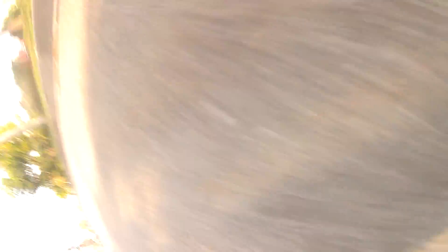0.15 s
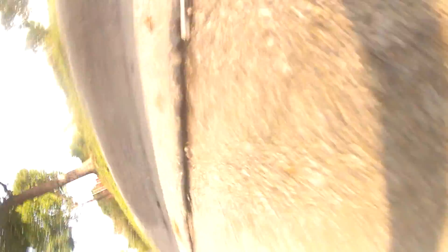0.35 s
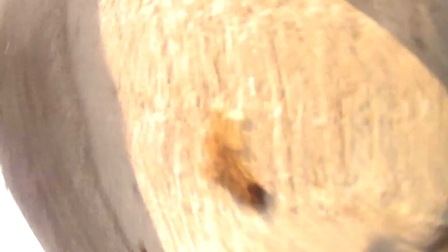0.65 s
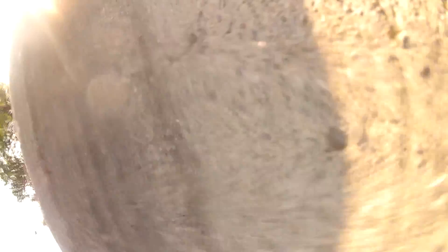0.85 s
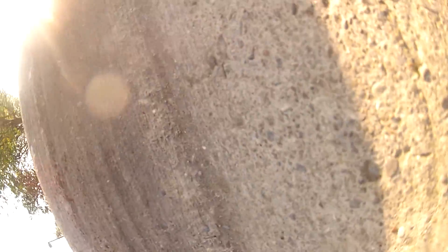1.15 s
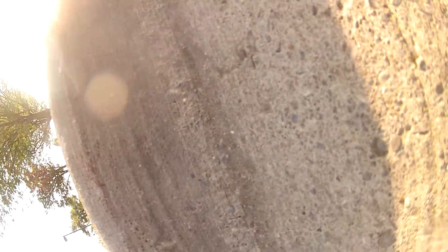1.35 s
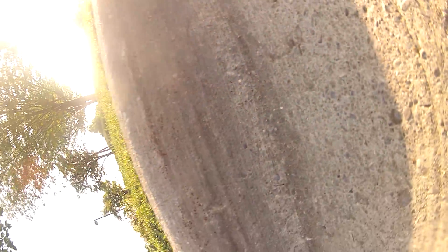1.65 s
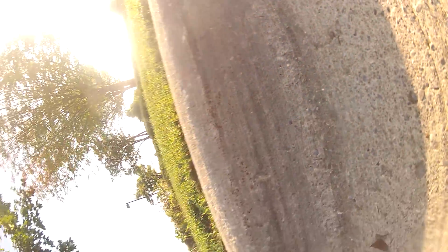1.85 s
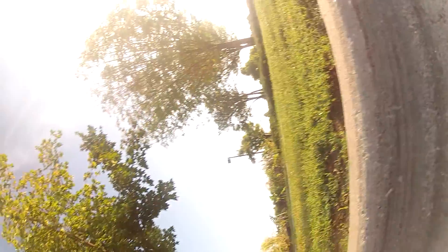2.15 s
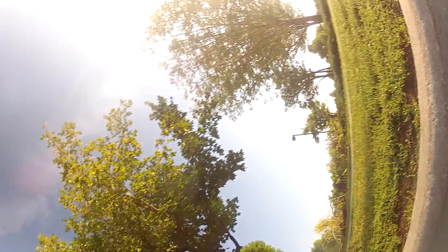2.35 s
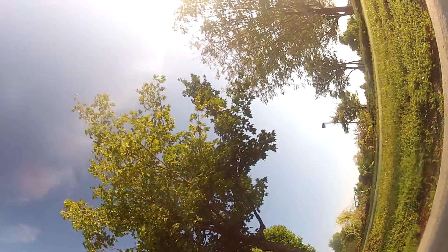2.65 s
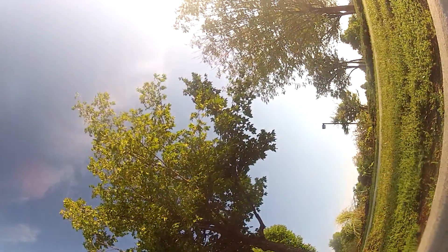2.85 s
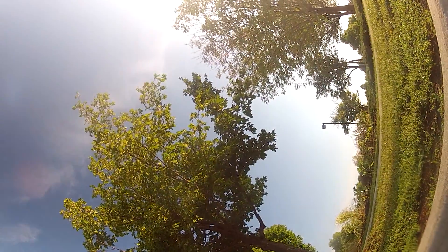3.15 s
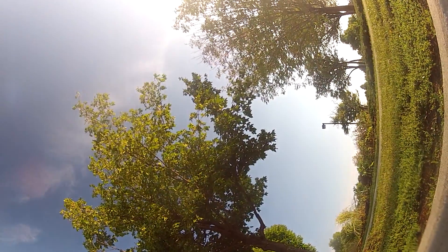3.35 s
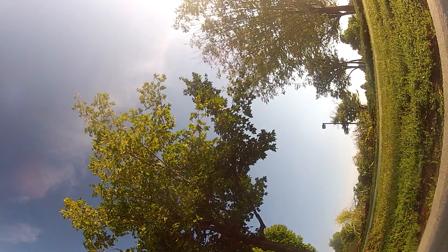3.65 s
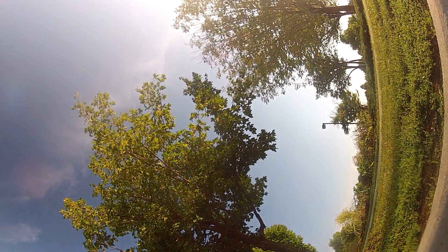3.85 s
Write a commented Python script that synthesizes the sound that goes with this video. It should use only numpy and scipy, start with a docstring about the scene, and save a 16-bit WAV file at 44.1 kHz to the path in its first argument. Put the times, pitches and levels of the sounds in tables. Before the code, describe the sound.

Bicycle tumbling on rough ground, sharp knocks, hollow thuds and gritty scrapes, heard from its frame

```python
"""On gravel and pavement, a bicycle falls, skids and tips to rest, heard by a camera fixed to it.
Noise bursts (blows) and random grains (slides, rubbing) drive filters for crack, housing ring and thud.
Blows and friction leave the frame ringing as thin tones; the mount shakes at one low wandering note.
Deep noise follows the thuds over faint air; a rubbing wheel hums now and then, ticking softly in the first.
Coarsely held samples add a thin mirrored fizz, and the recorder clips the loudest peaks."""
import sys
import numpy as np
from scipy import signal
from scipy.fft import rfft, irfft, next_fast_len
from scipy.io import wavfile
from scipy.ndimage import uniform_filter1d, map_coordinates

SR = 44100
rng = np.random.default_rng(int(sys.argv[2]) if len(sys.argv) > 2 else 0)


def transcribe(signal):
    """Save signal, clipped to [-1, 1], as a 16-bit WAV file at the path in sys.argv[1]."""
    frames = np.atleast_2d(signal).T
    limited = np.clip(frames, -1, 1)
    pcm = np.round(limited * 32767).astype(np.int16)
    wavfile.write(sys.argv[1], SR, pcm)


N = 176400
IR_LEN = 8192  # samples
MIC_CUTOFF_HZ = 3510  # low-pass of the housing

# hollow resonances of the bicycle on pavement: f/Hz, width/Hz, relative level/dB before tilt
TUBES = [(378, 35, 8), (474.7, 52, 3), (608, 22.5, 5.5), (763, 71, -2), (1020, 36, -5), (1376, 49, -16),
         (2057, 55, -21.5), (2634, 54, -40), (2887, 140, -32), (3436, 150, -39)]

# grit: stones, clumps of pressure, even friction re stones
GRAINS_PER_S, GRAIN_SPREAD_DB, SMOOTH_DB = 600, 5, -6.5
CLUMPS_PER_S, CLUMP_DB = 70, 2.5
# contacts
SCRAPE_EDGE_S = 0.0042  # rise and fall of a slide
KNOCK_REF_S = 0.003  # length that a blow's level refers to
FIRST_TOUCH = 2.9  # impulse against chatter of rms 1
CLEAR_FROM_S, CLEAR_TO_S = 1.3, 2.55  # camera clear of the ground; rubbing stays so to the end
BRIGHT_DB_PER_OCT, BRIGHT_DB = 8.5, -5  # tubes' upper modes re muffled crack while clear
DETUNE = 0.057  # std of log pitch shift per contact point
CRACK_DB = 6.5  # crack track in the mix
# frame
FRAME_DB, FRAME_DRIFT_RAD = -7, 0.97  # re housing; phase drift of each mode
# mount
SHAKE_HZ, SHAKE_REST_HZ, SHAKE_WANDER_HZ = 74.82, 70.6, 4.14  # swinging hard, at rest, unsteadiness
SHAKE_DB, SWING_MAX = 0.5, 0.85  # gain; end of travel in full scale
# rumble
LURCH_DB, LURCH_S = 2, 0.11  # re thuds; averaging window
AIR_DB = -45
# wheel
HUM_HZ, HUM_WANDER_HZ, HUM_ROUGH_DB = 382, 9, 3.5
HUM_RISE_S, HUM_FALL_S = 0.047, 0.078
TICK_FROM_S, TICK_TO_S, TICKS_PER_S, TICK_DB = 1.105, 1.27, 47, -11
# recorder
HOLD_HZ, TOP_HZ = 12000, 15600
FIZZ_DB, DRIVE_DB = 0.5, -0.5


def amp(db):
    """Decibels to gain."""
    return 10 ** (np.asarray(db) / 20)


def unit(x):
    """Scale to rms 1."""
    return x / np.sqrt(np.mean(x ** 2) + 1e-20)


def curves(rows):
    """Interpolate each column after the time to one value per sample."""
    s, *cols = np.transpose(rows)
    return [np.interp(np.arange(N) / SR, s, c) for c in cols]


def wobble(rate_hz):
    """Smooth random curve with rate_hz knots a second."""
    knots = rng.standard_normal(int(N * rate_hz / SR) + 4)
    return map_coordinates(knots, [np.arange(N) * rate_hz / SR])


def through(x, h):
    """Play x through an impulse response."""
    return signal.fftconvolve(x, h)[:N]


def add(track, s, x):
    """Mix x into the track from time s."""
    part = track[max(round(s * SR), 0):][:len(x)]
    part += x[:len(part)]


def colour(points):
    """Minimum-phase impulse response of energy 1 with this (f/Hz, level/dB) spectrum."""
    hz, db = np.transpose(points)
    f = np.fft.rfftfreq(IR_LEN, 1 / SR)
    gain = amp(np.interp(np.log(f + 1), np.log(hz), db))
    cep = irfft(np.log(gain))
    # folding the cepstrum makes the response causal
    cep[1:IR_LEN // 2] *= 2
    cep[IR_LEN // 2 + 1:] = 0
    h = irfft(np.exp(rfft(cep)))
    return h / np.linalg.norm(h)


def muffled(h):
    """Impulse response low-passed by the housing, scaled to energy 1."""
    sos = signal.butter(10, MIC_CUTOFF_HZ, fs=SR, output="sos")
    h = signal.sosfilt(sos, h)
    return h / np.linalg.norm(h)


def resonances(rows, tilt_db=0, shift=1):
    """Damped modes of alternating sign, tilted in dB per octave and shifted in pitch, then muffled."""
    f = np.fft.rfftfreq(IR_LEN, 1 / SR) / shift
    spectrum = 0
    for k, (hz, width, db) in enumerate(rows):
        gain = (-1) ** k * amp(db + tilt_db * np.log2(hz))
        bandpass = 1j * f * width / (hz * hz - f * f + 1j * f * width)
        spectrum = spectrum + gain * bandpass
    return muffled(irfft(spectrum))


def grit():
    """Contact force of sliding: stones of random size catch in clumps, over even friction."""
    caught = rng.random(N) < GRAINS_PER_S / SR
    size = amp(GRAIN_SPREAD_DB * np.clip(rng.standard_normal(N), -2, 2))
    stones = caught * rng.choice([-1, 1], N) * size
    pressure = amp(CLUMP_DB * np.clip(wobble(CLUMPS_PER_S), -1.5, 1.5))
    friction = amp(SMOOTH_DB) * rng.standard_normal(N)
    return unit(pressure * (unit(stones) + friction))


def rubbing(on_gravel, clear):
    """Light grit between blows, passed through the gravel filters and later the clear ones."""
    # t/s, crack/dB before CRACK_DB, housing/dB, thud/dB
    rub_levels = [(0, -27, -20, -11), (.11, -47.5, -36, -30.5), (.34, -36.5, -28, -35.5),
                  (.51, -42.5, -40.5, -22), (.67, -45, -34, -29.5), (.8, -41, -28.5, -21),
                  (.94, -45.5, -34, -22.5), (1.02, -50.5, -35.5, -25), (1.26, -52.5, -53, -22),
                  (1.459, -54, -55, -39.5), (1.63, -51, -41, -30), (1.75, -62.5, -49.5, -50.5),
                  (1.95, -53.5, -31.5, -23.5), (2.21, -44.5, -36, -26), (2.321, -51, -30, -39),
                  (2.601, -44, -30, -20), (2.82, -55.5, -39, -31.5), (2.97, -68.5, -43, -32),
                  (3.061, -76.5, -50.5, -55), (4, -103, -96, -82)]
    rub = grit()
    lifted = np.arange(N) / SR > CLEAR_FROM_S
    tracks = []
    for db, near, far in zip(curves(rub_levels), on_gravel, clear):
        force = rub * amp(db)
        far = far / np.linalg.norm(far)
        tracks.append(through(force * ~lifted, near) + through(force * lifted, far))
    return tracks


def slides():
    """Slides on the ground: grit pressed on and released with linear edges."""
    # t/s, length/s, crack/dB before CRACK_DB, housing/dB, thud/dB
    scrapes = [(0.13, 0.072, -30, -20, -12), (0.249, 0.025, -17, -14, -24), (0.275, 0.042, -26.5, -37, -21),
               (0.363, 0.063, -28, -30, -30), (0.429, 0.048, -38, -31, -20),
               (0.693, 0.083, -29.5, -20.5, -10.5), (0.876, 0.054, -31, -21.5, -28),
               (1.143, 0.099, -55.5, -37.5, -19.5), (1.772, 0.037, -59, -32.5, -25),
               (1.806, 0.023, -45, -25.5, -29), (1.904, 0.0352, -59, -13.5, -22),
               (1.946, 0.11, -43.5, -26, -32.5), (2.115, .034, -27, -17, -18.5),
               (2.351, 0.058, -69, -20.5, -26), (2.453, 0.13, -38, -26, -14),
               (2.657, 0.065, -42.5, -26, -22)]
    slide = grit()
    forces = []
    for s, length, *dbs in scrapes:
        t = np.arange(int((length + SCRAPE_EDGE_S) * SR)) / SR
        press = np.clip(np.minimum(t, t[-1] - t) / SCRAPE_EDGE_S, 0, 1)
        forces.append((s, length, press * slide[int(s * SR):][:len(t)], dbs))
    return forces


def blows():
    """Blows: an impulse at first touch, then chatter decaying over the contact time."""
    # t/s, contact decay/s, crack/dB before CRACK_DB, housing/dB, thud/dB
    knocks = [(.052, 0.0014, -33, -35.5, -35), (.078, 0.0016, -33.5, -38.5, -28.5),
              (.168, .002, -40.5, -24, -9.5), (.188, 0.0011, -37.5, -16, -3), (.197, .002, -16, -12.5, -8),
              (.257, 0.004, -17.5, -15, -14), (.271, 0.0063, -8.5, -25.5, -35.5),
              (.413, 0.0027, -21.5, -20.5, -9.5), (.448, 0.0029, -39.5, -13.5, -38),
              (.479, .003, -27.5, -36, -44.5), (.535, 0.0018, -6.5, -24, -1), (.572, 0.0043, -29, -48, -30),
              (.606, .003, -24.5, -21, -6), (.699, 0.0037, -12, -17.5, -6.5),
              (.710, 0.0028, -24, -16.5, -9), (.714, 0.0032, -15, -6.5, -2.5),
              (.735, 0.0024, -23.5, -26, -12), (.764, .003, -28, -27, -34), (.804, 0.002, -30, -35, -30),
              (.868, 0.0017, -35, -29, -33), (.914, 0.0041, -64, -20, -2.5),
              (1.375, 0.0052, -30.5, -47, -22.5), (1.498, 0.0072, -16.5, -14.5, -9),
              (1.510, 0.0074, -33, -7, -9), (1.929, 0.0045, -34.5, -19.5, -19),
              (2.004, 0.001, -23, -26, -50), (2.037, 0.0068, -21.5, -25, -7.5),
              (2.071, .003, -33.5, -17, -25), (2.124, .009, -21, -20.5, -24.5),
              (2.266, 0.0044, -23, -15.5, -18.5), (2.279, 0.0018, -29, -24.5, -37),
              (2.465, 0.0043, -24, -9, -20.5), (2.503, .003, -38.5, -23.5, -12),
              (2.538, 0.0019, -26.5, -17.5, -6.5), (2.554, 0.0028, -16, -3, -20),
              (2.651, 0.0032, -8.5, -19, -30), (2.654, 0.01, -25, -9, -18)]
    t = np.arange(IR_LEN // 4) / SR
    forces = []
    for s, contact, *dbs in knocks:
        force = rng.standard_normal(len(t)) * np.exp(-t / contact)
        force[0] -= FIRST_TOUCH
        forces.append((s, KNOCK_REF_S, force, dbs))
    return forces


def contacts():
    """Rubbing, slides and blows each drive a crack, a housing ring and a thud."""
    # crack spectrum: f/Hz, relative level/dB
    crack_points = [(100, -38), (350, 12.5), (750, 3.5), (1100, -1.5), (1800, -5), (2400, -13.5),
                    (3000, -15), (3600, -14), (4200, -26), (5200, -27.5), (6200, -48), (10000, -98)]
    # short housing resonances on gravel: f/Hz, width/Hz, relative level/dB
    housing_modes = [(394.3, 62, 5.5), (471, 47, 2), (622.4, 50, -1), (813, 62, -2.5), (1020, 37, -8),
                     (1354, 100, -11.5)]
    # thud spectrum: f/Hz, relative level/dB
    thud_points = [(40, -22.5), (100, 10), (150, 7.5), (220, -0.5), (330, -3), (550, -17), (1200, -43),
                   (3000, -82.5)]
    crack, thud = colour(crack_points), colour(thud_points)
    on_gravel = [crack, resonances(housing_modes), thud]
    # clear of the ground, muffled cracks also carry some of the tubes' upper modes
    bright = muffled(crack) + amp(BRIGHT_DB) * resonances(TUBES, BRIGHT_DB_PER_OCT)
    clear = [bright, resonances(TUBES), thud]
    tracks = rubbing(on_gravel, clear)
    for s, length, force, dbs in slides() + blows():
        # housing notes shift with each new point of contact
        shift = np.exp(DETUNE * rng.standard_normal())
        direct = [crack, resonances(housing_modes, shift=shift), thud]
        path = clear if CLEAR_FROM_S < s < CLEAR_TO_S else direct
        for track, h, db in zip(tracks, path, dbs):
            sound = signal.fftconvolve(force, h)
            add(track, s, amp(db) * np.sqrt(length * SR) * sound / np.linalg.norm(sound))
    return tracks


def frame(drive):
    """Each mode of frame and wheels stores the drive's energy and rings on as a thin tone."""
    # long ringing modes: f/Hz, level/dB before FRAME_DB, t60/s
    frame_modes = [(359.3, -9, 2.8), (383, -2.5, 2.5), (397.7, -8, 2.4), (607, -13, 2.8), (620, -21.5, 1.5),
                   (770, -17.5, 2.4), (860, -19, 2.2), (1039, -24, 1.1), (1140, -23, 0.8),
                   (1420, -25, 0.59), (2050, -34.5, 2)]
    t = np.arange(N) / SR
    ring = np.zeros(N)
    for hz, db, t60 in frame_modes:
        fall = np.exp(-2 * np.log(1000) / (t60 * SR))  # energy kept per sample
        stored = np.sqrt(signal.lfilter([1 - fall], [1, -fall], drive ** 2))
        phase = 2 * np.pi * (hz * t + rng.random()) + FRAME_DRIFT_RAD * wobble(20)
        ring += amp(db) * stored * np.sin(phase)
    return amp(FRAME_DB) * ring


def mount():
    """The camera swings on its mount: higher and less steady when thrown about, limited by its travel."""
    # swing: t/s, level/dB before SHAKE_DB, wobble and travel limit
    shake = [(0, -10.5), (.23, -21), (.46, -13.5), (.66, -20), (.96, -5.5), (1.01, -17), (1.47, -27),
             (1.51, -12), (1.63, -15), (1.76, -30.5), (2.07, -8), (2.17, -11.5), (2.23, -22), (2.41, -20),
             (2.52, -1.5), (2.68, -14), (2.89, -10.5), (2.96, -18), (4, -63)]
    db, = curves(shake)
    effort = np.clip(amp(db + 14), 0, 1)
    hz = SHAKE_REST_HZ + effort * (SHAKE_HZ - SHAKE_REST_HZ + SHAKE_WANDER_HZ * wobble(22))
    unsteady_db = 5.7 * np.sqrt(effort) * wobble(22.084)
    swing = np.sqrt(2) * amp(db + SHAKE_DB + unsteady_db)
    limited = SWING_MAX * np.tanh(swing / SWING_MAX)
    return limited * np.sin(2 * np.pi * np.cumsum(hz) / SR)


def rumble(thud):
    """Deep noise scaled by the running rms of the thuds as the bicycle lurches, plus quiet air."""
    # lurch spectrum: f/Hz, relative level/dB
    lurch_points = [(20, -12.5), (48, 0), (70, -9), (105, -4), (150, -26), (400, -82)]
    # air spectrum: f/Hz, relative level/dB
    air_points = [(20, 2.5), (60, -3.5), (100, 10.5), (150, -17), (400, -20), (1000, -30.5), (5000, -39),
                  (9000, -70)]
    jolt = np.sqrt(np.abs(uniform_filter1d(thud ** 2, max(int(LURCH_S * SR), 1))))
    lurch = amp(LURCH_DB) * jolt * through(rng.standard_normal(N), colour(lurch_points))
    air = amp(AIR_DB) * through(rng.standard_normal(N), colour(air_points))
    return lurch + air


def wheel_hum():
    """A rubbing wheel's rough, wavering sine swells linearly and dies away exponentially."""
    # t/s, length/s, rms level/dB before roughness
    hums = [(1.051, 0.18, -24), (1.33, 0.082, -32.5), (1.505, 0.037, -26.5), (2.839, 0.2, -35.5)]
    t = np.arange(N) / SR
    level = np.zeros(N)
    for s, length, db in hums:
        rise = np.clip((t - s) / HUM_RISE_S, 0, 1)
        fall = np.exp(-np.maximum(t - s - length, 0) / HUM_FALL_S)
        level += amp(db) * rise * fall
    hz = HUM_HZ + HUM_WANDER_HZ * wobble(30)
    rough = amp(HUM_ROUGH_DB * wobble(60))
    return np.sqrt(2) * level * rough * np.sin(2 * np.pi * np.cumsum(hz) / SR)


def wheel_ticks():
    """The spinning wheel excites the lower tube modes in a short, evenly timed run of soft ticks."""
    track = np.zeros(N)
    tick = resonances(TUBES[:7], tilt_db=6.5)
    for s in np.arange(TICK_FROM_S, TICK_TO_S, 1 / TICKS_PER_S):
        add(track, s, amp(TICK_DB + 2 * rng.standard_normal()) * tick)
    return track


def scene():
    """Sum of everything that reaches the microphone."""
    crack, housing, thud = contacts()
    struck = amp(CRACK_DB) * crack + housing + thud
    bicycle = struck + frame(housing) + wheel_hum() + wheel_ticks()
    return (bicycle + mount() + rumble(thud))[None]


def record(dry):
    """Held samples mirror the sound around the hold rate; loud peaks clip; the top is cut."""
    m = next_fast_len(N + SR // 2)
    f = np.fft.rfftfreq(m, 1 / SR)
    carrier = np.cos(2 * np.pi * HOLD_HZ * np.arange(N) / SR)
    mirrored = dry * (1 + 2 * amp(FIZZ_DB) * carrier)
    held = irfft(rfft(mirrored, m) * np.sinc(f / HOLD_HZ), m)[:, :N]
    clipped = np.clip(amp(DRIVE_DB) * held, -1, 1)
    top_cut = 1 / np.sqrt(1 + (f / TOP_HZ) ** 80)
    return irfft(rfft(clipped, m) * top_cut, m)[:, :N]


dry = scene()
out = record(dry)
transcribe(out)
```